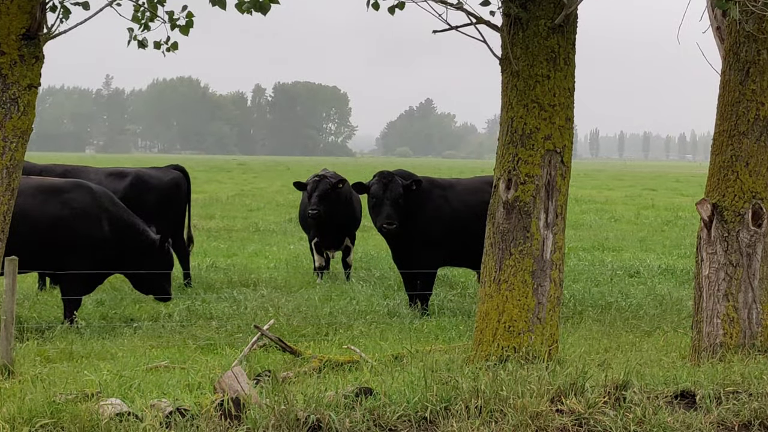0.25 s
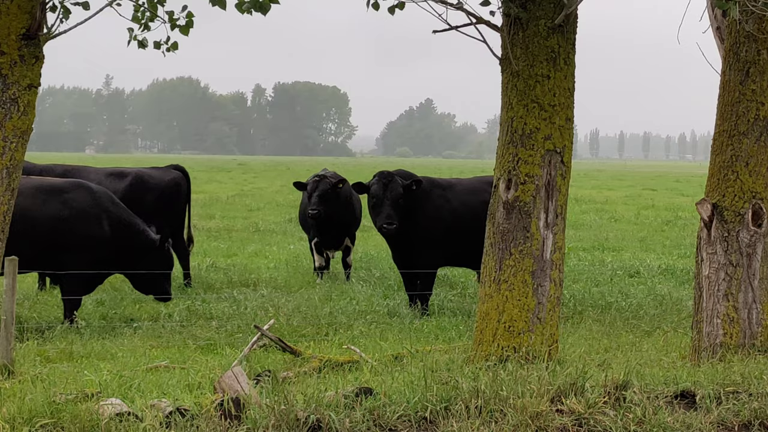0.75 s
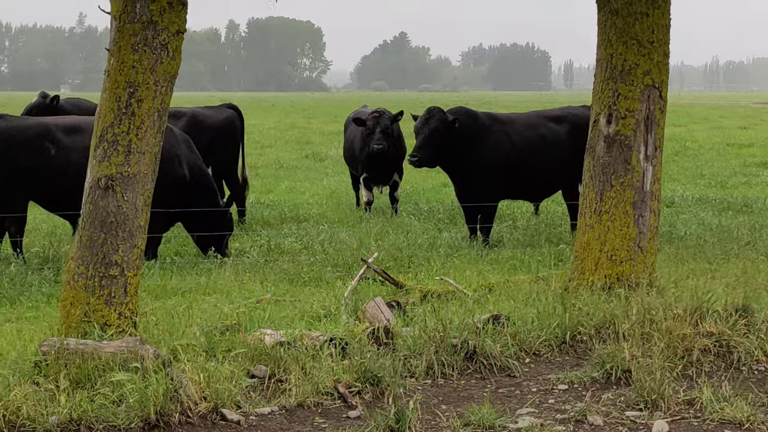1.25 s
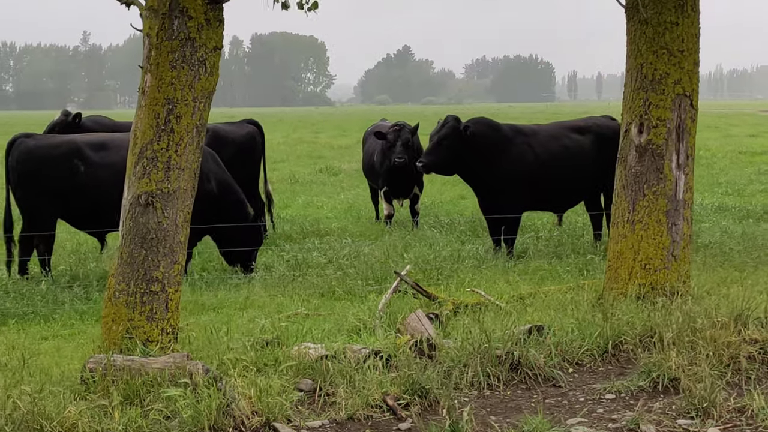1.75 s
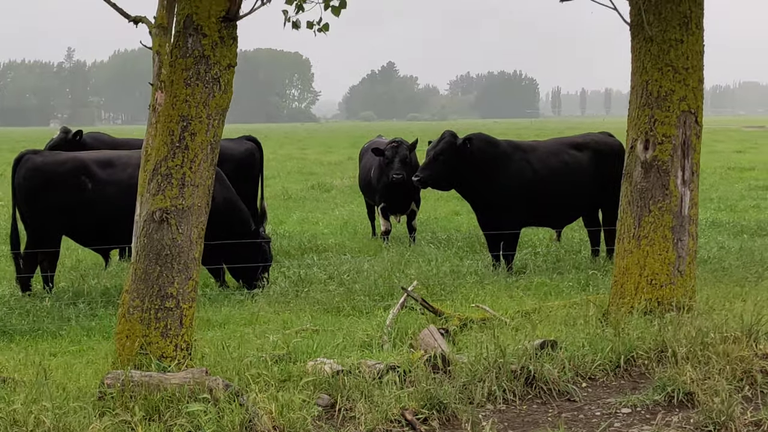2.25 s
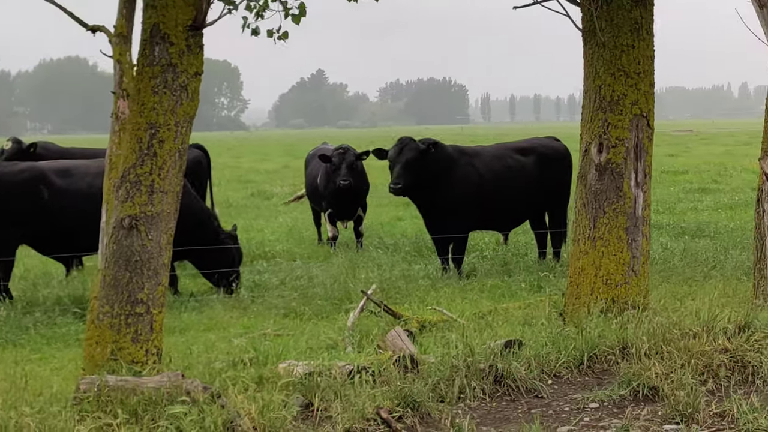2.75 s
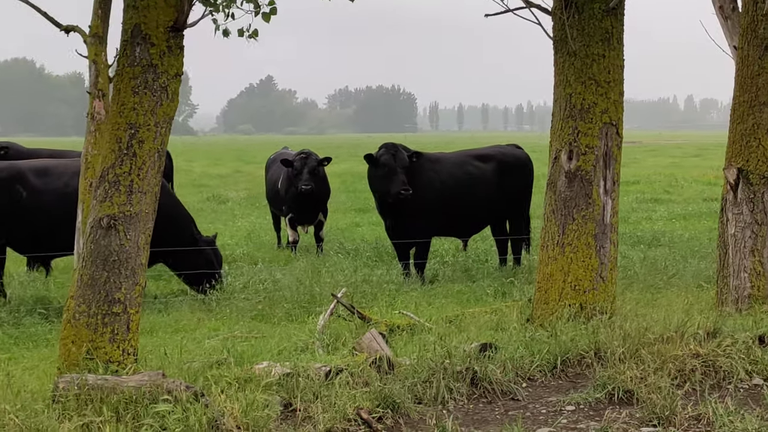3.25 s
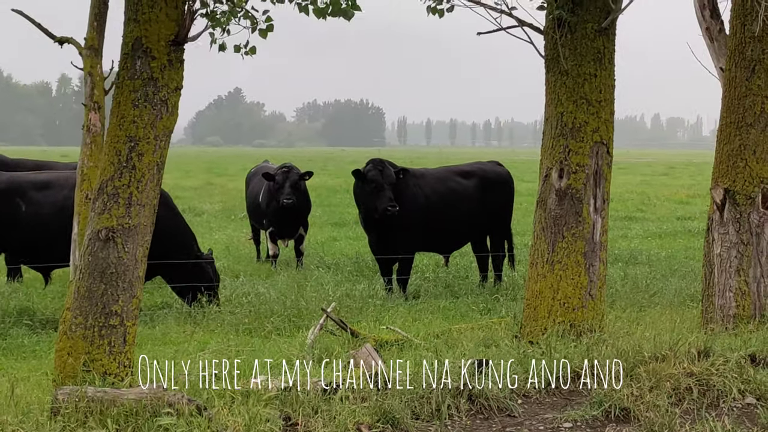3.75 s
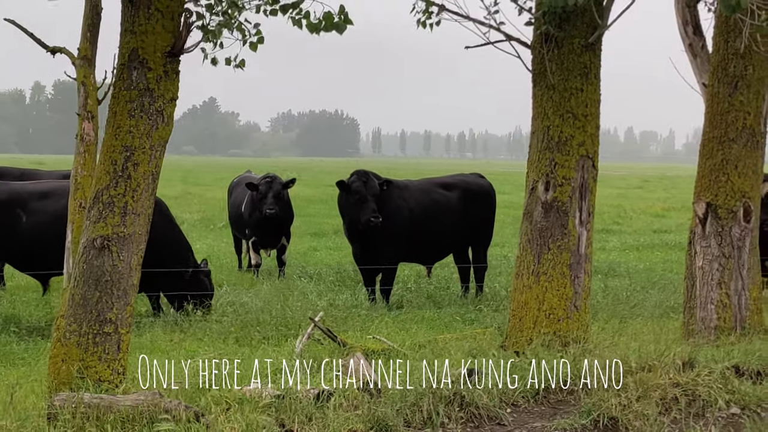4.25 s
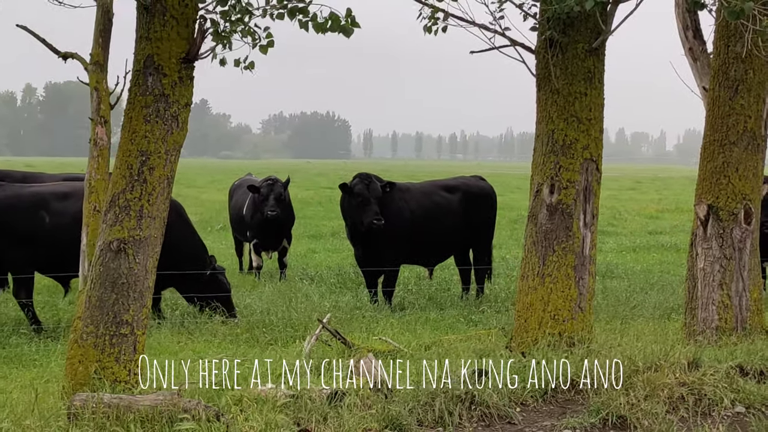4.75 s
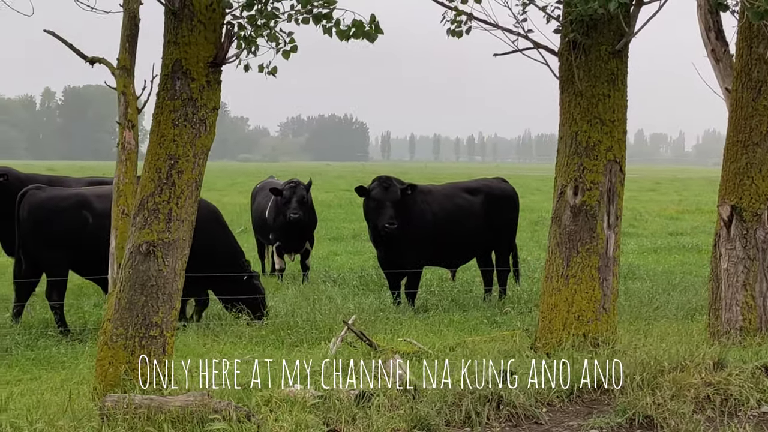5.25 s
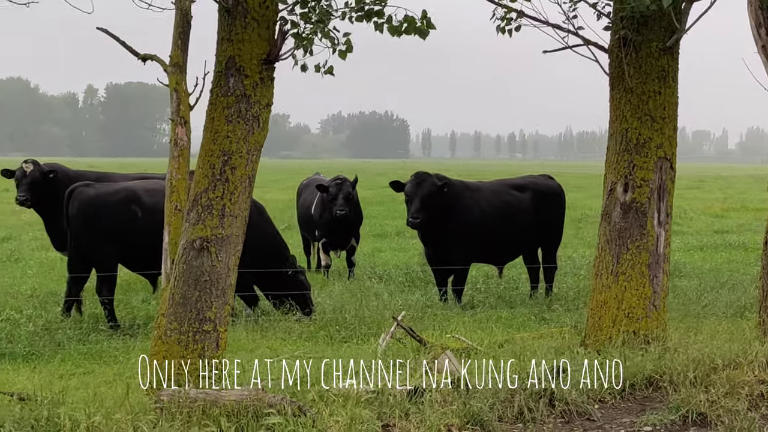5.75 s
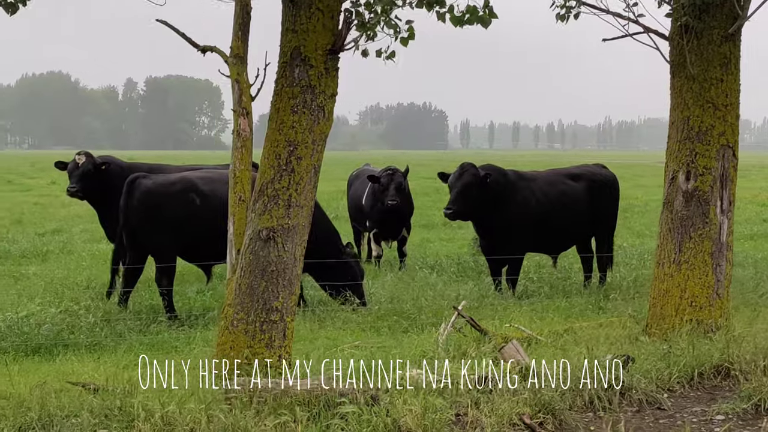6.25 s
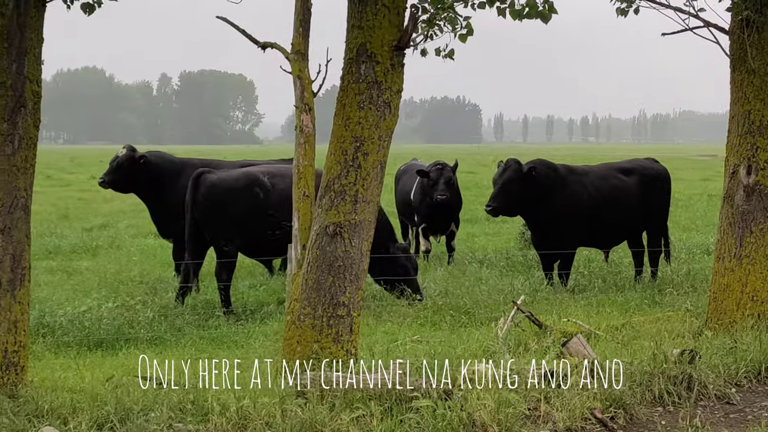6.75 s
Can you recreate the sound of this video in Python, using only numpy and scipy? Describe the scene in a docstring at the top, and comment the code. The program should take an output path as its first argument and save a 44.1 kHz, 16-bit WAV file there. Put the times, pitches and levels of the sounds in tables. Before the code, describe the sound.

An open pasture murmurs faintly, with small birds whistling and warbling in the trees throughout and a distant chorus leaning slightly left. From the start, gusts thump and rumble on the stereo microphone while a nearby bird gives short chucks. At about 0.6 seconds a bull lows for one second, a clean nasal hum that rises slightly, drops and ends in a puff of breath. The wind eases after 1.2 seconds and buffets again from 2.4 to 3. In the calmer stretch from 3 to 4.5 seconds, the nearby bird repeats a quick run of chucks. Leaves rustle softly, with tiny snaps around 3.4, and scattered drops tick on them, clearest near 1.9 and 3.9. From 5.6 to 6.6 seconds the bull lows again, slightly softer and hoarser, closing with another puff. Strong gusts return at about 6.2 and thump until the end at 7 seconds.

```python
"""A bull lows twice in an open pasture: a clean nasal hum from the vocal folds, carried by its
second harmonic and ending in a puff of breath. Close up, gusts thump on the two ports of a stereo
microphone. Small birds chuck and warble in the trees, with a chorus of others far off.
Leaves rustle, drops tick on them nearby, and the field murmurs and hisses faintly."""
import sys
import numpy as np
from scipy import signal
from scipy.io import wavfile
from scipy.ndimage import uniform_filter1d

SR = 44100
rng = np.random.default_rng(int(sys.argv[2]) if len(sys.argv) > 2 else 0)


def pcm_store(signal):
    """Save signal as 16-bit PCM."""
    levels = np.round(np.clip(np.atleast_2d(signal), -1, 1) * 32767)
    wavfile.write(sys.argv[1], SR, levels.astype(np.int16).T)


N = 308287
TIME_S = np.arange(N) / SR


def amp(db):
    return 10 ** (np.asarray(db) / 20)


def unit_rms(x):
    return x / np.sqrt(np.mean(x ** 2) + 1e-20)


def butter(x, order, hz, kind):
    return signal.sosfilt(signal.butter(order, hz, kind, fs=SR, output="sos"), x)


def over_time(rows):
    times, *columns = np.transpose(rows)
    return [np.interp(TIME_S, times, column) for column in columns]


def at_hz(points, hz):
    freqs, values = np.transpose(points)
    return np.interp(np.log(hz), np.log(freqs), values)


def drift(rate_hz):
    """A smooth random wander with an rms near 1."""
    pole = np.exp(-40 * np.pi * rate_hz / SR)
    slow = signal.lfilter([1], [1, -2 * pole, pole ** 2], rng.standard_normal(N // 20 + 2002))[2000:]
    return np.interp(np.arange(N) / 20, np.arange(len(slow)), unit_rms(slow))


def place(out, start_s, sound, pan_db):
    """Mix a short sound in; the nearer port hears it louder and first. Positive pan is left."""
    lag = .55 * pan_db  # samples between the ports
    for channel, side in enumerate((1, -1)):
        i = max(round(start_s * SR - side * lag / 2), 0)
        out[channel, i:i + len(sound)] += sound[:max(N - i, 0)] * amp(side * pan_db / 2)


# How alike the two ports hear diffuse noise: freq_hz, correlation
PORT_LIKENESS = [(25, 0.73), (70, 1), (300, 0.99), (600, 0.9), (1200, 0.087), (2500, 0.69), (4000, 0.61),
                 (9000, 0.87), (13000, 0.074)]

def diffuse_noise(spectrum, flicker_db, flicker_hz):
    """Stereo noise of rms 1 in roughly third-octave bands, each with its own level and flicker."""
    bottom, top = spectrum[0][0], spectrum[-1][0]
    edges = np.geomspace(bottom, top, int(3 * np.log2(top / bottom)) + 3)
    white = rng.standard_normal((2, 2, N))
    out, shared_drift = 0, drift(flicker_hz)
    for k, band in enumerate(zip(edges, edges[1:])):
        mid, side = butter(white[k % 2], 2, band, "band")
        hz = np.sqrt(band[0] * band[1])
        alike = at_hz(PORT_LIKENESS, hz)
        gain = amp(at_hz(spectrum, hz) + flicker_db * (.4 * shared_drift + drift(flicker_hz)))
        out = out + gain * (np.sqrt(1 + alike) * mid + np.sqrt(1 - alike) * side * [[1], [-1]])
    return unit_rms(out)


# Gusts right at the microphone: time_s, level_db
GUSTS = [(0.0, -8), (.3, -21.5), (.47, -26), (0.66, -10), (0.86, -28.5), (1.2, -26.5), (1.75, -42.5),
         (2.3, -48), (2.43, -27.5), (2.63, -14.5), (2.95, -27), (3.02, -41), (3.3, -52), (3.9, -38),
         (4.1, -38), (4.4, -30.5), (4.6, -41.5), (5.1, -44), (5.57, -31.5), (6.15, -32), (6.41, -12),
         (6.99, -15.5)]
# Spectrum of their rumble: freq_hz, density_db
RUMBLE = [(12, -43.5), (25, 2.5), (60, -20.5), (80, 4), (102, 3.5), (172, -23.5), (222, -13.5),
          (286, -15.5), (440, -69), (900, -53), (1170, -90.5), (1980, -120)]
# The hardest eddies on the ports: middle_s, level_db, pitch_hz, length_s, edge_db
THUMPS = [(.013, -8, 146, 0.016, -18), (.028, -6, 151, 0.015, -49), (.062, -11, 106, 0.021, -55),
          (.114, -4.5, 154, 0.0084, -36), (.17, -22, 99, 0.016, -58), (.205, -16, 129, 0.016, -51),
          (.234, -9, 107, 0.018, -53), (.259, -6, 139, 0.011, -51), (.33, -14.5, 102, 0.021, -65),
          (.363, -13, 111, 0.024, -64), (.418, -17, 173, 0.0089, -57), (.522, -8.5, 121, 0.0079, -59),
          (.536, -10.5, 118, 0.027, -62), (.56, -30, 111.4, 0.014, -60), (.605, -8, 106, 0.017, -63),
          (.622, -1, 104.6, 0.023, -51), (.676, -6.5, 134, 0.017, -39), (.706, -13, 112, 0.011, -44),
          (.731, 3, 103, 0.026, -13), (1.046, -12.5, 94, 0.029, -45), (1.119, -17, 112, 0.028, -45),
          (1.195, 1.5, 116.5, 0.03, -8), (1.572, -25, 78.66, 0.027, -67), (1.757, -27.5, 89.8, 0.04, -67),
          (1.787, -26, 79.5, 0.059, -70), (1.98, -25.5, 70, 0.033, -70), (2.03, -32, 106.5, 0.052, -70),
          (2.387, -24, 110, 0.035, -68), (2.411, -15.5, 99, 0.025, -68), (2.432, -31, 110, 0.022, -73),
          (2.474, -8.5, 111, 0.026, -57), (2.502, -18.5, 153, 0.024, -64), (2.552, -5.5, 109.4, 0.015, -57),
          (2.607, -10, 128.8, 0.034, -60), (2.685, -2, 127.8, 0.011, -45), (2.733, -7, 109, 0.029, -59),
          (2.752, -8, 100, 0.029, -41), (2.836, -16, 94.3, 0.064, -43), (2.899, -24, 120, 0.015, -60),
          (2.948, -15.5, 113, 0.023, -58), (2.973, -16.5, 178, 0.016, -66), (3.569, -13.5, 132, 0.01, -50),
          (4.36, -19, 147, 0.008, -65), (6.245, -2.5, 150, 0.0087, -63), (6.29, 1, 98, 0.02, -55),
          (6.312, -7, 161, 0.014, -63), (6.343, -4, 141.2, 0.0145, -45), (6.381, -6.5, 168, 0.016, -58),
          (6.405, -13, 186, 0.0078, -49.5), (6.422, 0.5, 184, 0.0088, -32), (6.431, -8, 151.5, 0.018, -41),
          (6.454, 3, 173, 0.013, -34), (6.475, -7.5, 159, 0.015, -21), (6.503, -6.5, 192, 0.0087, -51),
          (6.527, -7, 197, 0.03, -41), (6.568, -14.5, 230, 0.011, -39), (6.604, -3, 126, 0.015, -27),
          (6.617, -11, 228, 0.011, -54), (6.634, -2, 192, 0.0089, -50), (6.681, 3.5, 145.9, 0.0077, -25),
          (6.71, -4.5, 150.7, 0.012, -33), (6.718, -5, 183, 0.021, -22), (6.742, -10, 170, 0.008, -43),
          (6.764, -8.5, 132, 0.0062, -55), (6.825, -9, 117.4, 0.028, -36), (6.857, -5, 156, 0.01, -55),
          (6.894, -1.5, 206, 0.011, -74), (6.908, -11, 197, 0.0074, -62), (6.961, -12, 166, 0.013, -57),
          (6.982, -8, 108, 0.019, -60)]

def wind():
    """Gusts rumble on the ports; each eddy is a short pressure swing with a sharp edge at its height."""
    gust_db, = over_time(GUSTS)
    when, weakness, pitch, stretch = rng.random((round(13 * N / SR), 4)).T  # 13 lesser eddies a second
    eddy_db = gust_db[(when * N).astype(int)] + 9.5 - 13 * weakness
    eddy_hz = 95 * 1.7 ** pitch
    eddy_s = 2.344 * (.5 + stretch) / eddy_hz
    eddies = THUMPS + list(zip(when * N / SR, eddy_db, eddy_hz, eddy_s, eddy_db - 39.5))
    thumps = np.zeros((2, N))
    for middle_s, db, hz, length_s, edge_db in eddies:
        turn, side = rng.random(2)
        body = [(hz, length_s, db), (2.26 * hz, .009, (db + edge_db) / 2 - 1.5)]
        edge = [(620, .005, edge_db - 7), (1050, .003, edge_db - 14.5)]
        for swing_hz, swing_s, swing_db in body + edge:
            t = np.arange(round(swing_s * SR)) / SR
            swing = amp(swing_db) * np.hanning(len(t)) * np.sin(2 * np.pi * (swing_hz * t + turn))
            place(thumps, middle_s - swing_s / 2, swing, pan_db=3 * side - 1.5)
    rumble = amp(gust_db - 5) * diffuse_noise(RUMBLE, flicker_db=2, flicker_hz=20)
    return butter(thumps, 2, 72.5, "high") + rumble


# The open pasture all around: freq_hz, density_db
FIELD_SPECTRUM = [(12, -29), (20, 6.5), (76, 2), (145, -14), (282, -3.5), (477, -15), (549, -14),
                  (729, -19), (790, -24.5), (1280, -21), (1740, -39), (2080, -17.5), (2500, -12.5),
                  (3250, -54.5), (5500, -120)]
# Its slow swells: time_s, gain_db
FIELD_SWELLS = [(0, -2), (1.5, 2.5), (2.2, -1), (3.3, -1.5), (3.6, 4), (4.0, 0), (4.18, 4), (4.33, 3),
                (4.5, 3.5), (4.7, 1), (5.2, -0.5), (5.6, 1), (6.99, -1)]

def field():
    """A low murmur with a faint hiss above it."""
    swell_db, = over_time(FIELD_SWELLS)
    return amp(swell_db - 42.5) * diffuse_noise(FIELD_SPECTRUM, flicker_db=2, flicker_hz=16.6)


def whistle(db, length_s, from_hz, to_hz, rough, skew, waver):
    """A bird's gliding near-sine: rough flutters its level, waver its pitch; skew under 1 peaks early."""
    progress = np.linspace(0, 1, round(np.clip(length_s, .008, .2) * SR))
    flutter, wobble = uniform_filter1d(rng.standard_normal((2, len(progress))), 90)
    envelope = np.sin(np.pi * progress ** skew) * (1 + rough * unit_rms(flutter))
    pitch_hz = (from_hz + (to_hz - from_hz) * progress) * (1 + waver * unit_rms(wobble))
    phase = 2 * np.pi * np.cumsum(pitch_hz) / SR
    return amp(db) * envelope * (np.sin(phase) + amp(-36) * np.sin(2 * phase))


# Birds far across the pasture: time_s, level_db
CHORUS_LEVEL = [(0.0, -42), (0.56, -45), (1.38, -38), (1.5, -41), (2.3, -47), (2.49, -43), (3.35, -44.5),
                (3.7, -40.5), (3.89, -46.5), (4.13, -46), (4.3, -43), (4.88, -41), (5.14, -45),
                (5.76, -41.5), (6.09, -47.5), (6.39, -45), (6.56, -42), (6.99, -41.5)]
# Their spectrum: freq_hz, density_db
CHORUS_SPECTRUM = [(880, -26.5), (1500, -10), (1720, 1.5), (2110, -18), (3400, -2), (4060, -0.5),
                   (5890, -12), (6920, -4), (7950, -11), (8860, -21), (9500, -34), (12400, -65),
                   (20900, -120)]

def far_chorus():
    """Birds too far to tell apart blur into a hiss that leans left; air takes its top off."""
    chorus_db, = over_time(CHORUS_LEVEL)
    hiss = amp(chorus_db - 3.2) * diffuse_noise(CHORUS_SPECTRUM, flicker_db=2, flicker_hz=6)
    return butter(hiss * amp([[.9], [-.9]]), 10, 8000, "low")


def far_twitter(notes_per_s=160):
    """Distant whistles at random, as loud or soft as the chorus around them."""
    out = np.zeros((2, N))
    chorus_db, = over_time(CHORUS_LEVEL)
    for when, pitch, glide, size, side in rng.random((round(notes_per_s * N / SR), 5)):
        hz = 2800 * 2.2 ** pitch ** 1.5  # most lie low in the range
        to_hz = hz * 1.15 ** (2 * glide - 1)
        db = chorus_db[int(when * N)] + 1 + .8 * at_hz(CHORUS_SPECTRUM, hz) - 9 * size
        note = whistle(db, .015 + .05 * size, hz, to_hz, rough=.45, skew=.79, waver=.018)
        place(out, when * N / SR, note, pan_db=6 * side - 1.2)
    return out


# One bird near the microphone: start_s, level_db, pitch_hz, pan_db
CHUCKS = [(0.033, -36, 2370, 4.5), (0.099, -41.5, 2700, 3), (0.183, -33.5, 2550, 4), (0.345, -35, 2520, 2),
          (0.5267, -33, 2420, 4), (0.74, -39, 2340, 2), (0.9716, -37, 2270, -3.5), (2.9335, -37.5, 2260, 3),
          (3.1332, -33, 2300, 2), (3.276, -31, 2460, 3), (3.4248, -32.5, 2550, 4), (3.5828, -31, 2540, 3.5),
          (3.7483, -30.5, 2420, 4.5), (3.9169, -30.5, 2550, 4.5), (4.0883, -30, 2520, 4),
          (4.2895, -38.5, 2480, 0), (4.532, -36, 2390, 0.5)]

def chucks():
    """Each chuck is a quick falling whistle with a weak low tail."""
    out = np.zeros((2, N))
    for start_s, db, hz, pan_db in CHUCKS:
        head = whistle(db, .024, 1.05 * hz, .93 * hz, rough=.5, skew=.35, waver=.04)
        tail = whistle(db - 16, .024, .9 * hz, .54 * hz, rough=.9, skew=.6, waver=.027)
        place(out, start_s, head, pan_db)
        place(out, start_s + .01, tail, pan_db)
    return out


# Chips from the trees, a little left: start_s, length_s, level_db, tilt_db_per_khz
CHIPS = [(0.063, 0.067, -43, 1), (0.28, 0.079, -41, -0.7), (1.222, 0.013, -37, -5), (4.291, 0.018, -35, -3)]
# The partials of one chip: pitch_hz, gain_db
CHIP_PARTIALS = [(3900, -8.5), (4900, -1), (5700, -5.5), (6800, 3.5), (7400, -3.5), (8050, -12)]

def chips():
    """A bird's harsh chip: rough partials that sound together."""
    out = np.zeros((2, N))
    for start_s, length_s, level_db, tilt in CHIPS:
        for hz, gain_db in CHIP_PARTIALS:
            db = level_db + gain_db + tilt * (hz / 1000 - 6)
            partial = whistle(db, length_s, hz, hz, rough=.7, skew=.63, waver=.035)
            place(out, start_s, partial, pan_db=2)
    return out


# Other birds in the trees: start_s, length_s, from_hz, to_hz, level_db
CLEAR_NOTES = [(.064, 0.029, 3480, 7770, -38), (.088, .018, 5260, 7700, -44),
               (0.242, 0.015, 4970, 4130, -47), (0.276, 0.036, 3690, 7740, -38),
               (0.307, .02, 4800, 7320, -40), (.29, 0.056, 8050, 8000, -49),
               (0.369, 0.054, 4450, 4480, -36), (3.315, 0.044, 6800, 6800, -44),
               (6.371, 0.047, 3400, 3800, -41), (6.642, 0.032, 4400, 4070, -30),
               (0.673, 0.016, 4750, 4820, -38), (0.816, 0.054, 4120, 3980, -37),
               (0.865, 0.048, 3460, 3380, -39), (0.912, 0.058, 5300, 4730, -39.5),
               (1.005, 0.045, 5200, 4900, -36), (1.263, 0.048, 3520, 3850, -33.5),
               (1.366, 0.029, 4240, 4070, -36), (1.391, 0.017, 3370, 3680, -34),
               (1.429, 0.046, 3110, 3930, -40), (1.459, 0.04, 4940, 4960, -40),
               (1.7, 0.018, 3900, 4570, -42), (1.82, .05, 5750, 5750, -46), (1.948, 0.025, 4300, 5400, -41),
               (1.968, .02, 5250, 4350, -36), (1.99, 0.031, 4800, 4700, -43),
               (2.054, 0.023, 4070, 5300, -42), (2.25, .06, 6130, 6150, -50),
               (2.578, .018, 5250, 6880, -38), (2.597, 0.048, 5760, 5820, -44),
               (2.65, 0.032, 6700, 6900, -47), (2.294, 0.1, 4360, 4730, -40), (2.39, 0.03, 4650, 3980, -39),
               (2.419, 0.046, 4170, 4080, -39), (2.833, 0.07, 4830, 4900, -45.5),
               (3.08, 0.024, 4500, 5470, -39.5), (3.153, 0.034, 4370, 4600, -40),
               (3.207, 0.023, 4200, 4060, -38), (4.117, 0.042, 4100, 4230, -36),
               (4.164, 0.051, 3410, 3670, -38.5), (4.2, 0.038, 4970, 5160, -45),
               (4.273, 0.024, 4150, 4030, -38), (4.268, 0.026, 7760, 8400, -38.5),
               (4.52, 0.027, 7080, 7200, -51), (4.89, 0.036, 5070, 5200, -36),
               (5.178, .03, 6600, 6600, -47), (5.25, 0.062, 6900, 6830, -47),
               (5.305, 0.033, 5000, 5100, -52), (5.342, 0.039, 5750, 5540, -44),
               (4.948, 0.037, 4740, 4870, -37), (5.021, 0.038, 4530, 4750, -40.5),
               (5.399, 0.054, 4160, 4050, -36), (5.423, 0.045, 3150, 3190, -38),
               (5.449, 0.033, 5300, 5130, -37), (5.648, 0.039, 5920, 5900, -47),
               (6.27, 0.03, 6100, 6200, -46), (5.74, 0.029, 4850, 4100, -44),
               (5.839, 0.079, 4120, 3980, -34), (5.89, 0.05, 3510, 3400, -39),
               (5.925, 0.018, 4480, 5100, -30), (5.948, 0.061, 3770, 4390, -38.5),
               (5.992, 0.032, 3600, 3820, -40), (6.109, 0.045, 4630, 4530, -46),
               (6.156, 0.044, 5080, 5300, -48.5), (6.309, 0.069, 4580, 4580, -44),
               (6.367, 0.038, 5800, 5800, -43), (6.479, 0.009, 5300, 6200, -38.5),
               (6.486, 0.0071, 6000, 7200, -36), (6.498, 0.016, 4020, 4170, -34),
               (6.551, 0.073, 3360, 3160, -41.5), (6.541, .045, 4200, 4190, -40)]

def clear_notes():
    """Single clean whistles from scattered directions, more of them on the left."""
    out = np.zeros((2, N))
    for start_s, length_s, from_hz, to_hz, db in CLEAR_NOTES:
        note = whistle(db + .5, length_s, from_hz, to_hz, rough=.3, skew=.63, waver=.014)
        place(out, start_s, note, pan_db=rng.normal(1.6, 3.3))
    return out


def trunk_scatter(song):
    """Birdsong plus its echoes off trunks and ground, each in the opposite channel."""
    out = song.copy()
    for k, delay_s in enumerate(rng.uniform(.012, .21, size=28)):
        lag = round(delay_s * SR)
        out[k % 2, lag:] += amp(-19 - 90 * delay_s) * song[1 - k % 2, :-lag]
    return out


# Leaves stirring in the trees: peak_s, level_db, swell_s, fade_s (swell and fade span 20 dB)
RUSTLES = [(.18, -63, .02, .04), (.62, -48.5, 0.085, 0.033), (1.23, -49, 0.14, 0.35),
           (1.6, -56, 0.037, 0.033), (2.511, -62, 0.043, 0.12), (2.85, -62, 0.017, 0.21),
           (3.35, -48, 0.021, 0.23), (4.3, -54, 0.075, 0.082), (4.78, -59, 0.41, 0.053),
           (5.49, -59, 0.17, 0.087), (5.6, -56, 0.027, 0.058), (5.772, -62, 0.052, 0.2),
           (5.92, -47.5, 0.26, 0.24), (6.22, -57, 0.098, 0.19), (6.62, -52.5, 0.14, 0.039),
           (6.98, -68, 0.12, .05)]
# Their spectrum: freq_hz, density_db
LEAF_SPECTRUM = [(5000, -47.5), (8500, -3), (9150, -8), (10000, -14.5), (11500, -5.5), (13100, -8.5),
                 (14800, -4), (15700, -20)]
# Dry twigs and leaves snapping, a little left: start_s, level_db
SNAPS = [(0.1844, -51), (0.619, -38), (1.2231, -31), (1.6053, -43), (1.8926, -46), (2.8818, -39),
         (3.3443, -25), (3.3752, -37), (3.4306, -30), (3.4774, -43), (3.536, -63), (4.2914, -47),
         (5.597, -45), (6.2337, -46), (6.542, -40)]

def leaves():
    """A bright rustle swells with each stir, broken up by tiny snaps and a few louder ones."""
    level = amp(-70) + sum(amp(db - 20 * np.maximum((s - TIME_S) / swell_s, (TIME_S - s) / fade_s))
                           for s, db, swell_s, fade_s in RUSTLES)
    tiny_snaps = (rng.random(N) < 250 / SR) * np.minimum(rng.exponential(1, N), 2.5)
    grain = 1 + .8 * signal.lfilter([1], [1, -.97], tiny_snaps)
    out = level * unit_rms(grain * diffuse_noise(LEAF_SPECTRUM, flicker_db=2.5, flicker_hz=6.4))
    decay = np.exp(-TIME_S[:600] / .0011)
    for start_s, db in SNAPS:
        crack = butter(rng.standard_normal(len(decay)) * decay, 3, 6000, "high")
        place(out, start_s, amp(db - 4) * crack, pan_db=1.5)
    return out


# One bird repeating itself, a little left: start_s, level_db, pitch_ratio
CHIRRUPS = [(0.325, -39.5, 0.96), (1.175, -39.5, 1.03), (2.59, -37.5, 1.017), (3.515, -39, 0.98),
            (4.43, -38.5, .99), (5.575, -39, 1), (6.641, -40.5, 1)]
# Its rise, fall, flick and tail: offset_s, length_s, from_hz, to_hz, gain_db
CHIRRUP_NOTES = [(-.022, .022, 4700, 5730, -5), (0, .03, 4250, 4600, 0), (.022, 0.03, 4050, 3450, 1.5),
                 (.047, .024, 3000, 3550, 2.5), (.072, .022, 3800, 3050, 1.5),
                 (.092, .04, 3700, 3500, -5.5)]

def chirrups():
    """A scratchy phrase in two voices at once, each with its own strong flutter and waver."""
    out = np.zeros((2, N))
    for start_s, db, ratio in CHIRRUPS * 2:
        for offset_s, length_s, from_hz, to_hz, gain_db in CHIRRUP_NOTES:
            note = whistle(db + gain_db - 1, 1.2 * length_s, from_hz * ratio, to_hz * ratio,
                           rough=.7, skew=.8, waver=.047)
            place(out, start_s + offset_s, note, pan_db=2)
    return out


def resonance(hz, centre_hz, width_hz):
    return 1 / (1 + (2 * (hz - centre_hz) / width_hz) ** 2)


# The bull's throat resonances: centre_hz, width_hz, gain_db (against harmonic 2)
THROAT = [(109, 47, -37), (504, 41, -43.5), (670, 37, -40), (2160, 210, -53), (2520, 92, -62)]
# Those that carry harmonics 3 and 4: centre_hz, width_hz, gain_db
LOW_THROAT = [(353, 53, -10.5), (428.6, 14, -19)]
# Passing mouth and nose resonances: start_s, length_s, from_hz, to_hz, width_hz, level_db
VOWELS = [(.62, .14, 690, 716, 60, -44), (.67, .26, 700, 755, 55, -36.5), (.88, .12, 750, 765, 50, -52),
          (.88, .26, 1175, 1225, 60, -51), (.95, .6, 975, 1040, 80, -49), (.85, .68, 640, 690, 70, -50),
          (.74, .2, 1030, 1050, 60, -56), (.75, .2, 1500, 1510, 100, -56), (.9, .66, 1740, 1730, 200, -51),
          (1.18, .35, 1300, 1300, 200, -55), (5.9, .72, 1055, 1075, 70, -52),
          (5.8, .76, 1350, 1395, 70, -52), (6.15, .25, 750, 755, 60, -56), (6.06, .5, 1282, 1285, 60, -53),
          (5.86, .6, 1800, 1810, 260, -55)]

def harmonic_gain(k, pitch_hz, level_db, opening_db, span):
    """How strongly throat, mouth and nose pass harmonic k during one call."""
    if k == 2:
        return amp(level_db)
    hz, t = k * pitch_hz, TIME_S[span]
    if k in (3, 4):
        throat = sum(amp(db) * resonance(hz, centre, width) for centre, width, db in LOW_THROAT)
        return amp(level_db + opening_db + 1.5 * drift(25)[span]) * throat
    throat = sum(amp(db) * resonance(hz, centre, width) for centre, width, db in THROAT)
    mouth = 0
    for start_s, length_s, from_hz, to_hz, width_hz, db in VOWELS:
        progress = np.clip((t - start_s) / length_s, 0, 1)
        envelope = np.abs(np.sin(np.pi * progress)) ** .6 * (progress < 1)  # opens fast and holds
        mouth += amp(db) * envelope * resonance(hz, from_hz + (to_hz - from_hz) * progress, width_hz)
    waver_db = 1.5 * drift(12)[span]
    rasp_db = (1.2 + (k / 9.5) ** 2) * drift(120)[span]
    return amp(waver_db + rasp_db - (k / 11) ** 2) * (amp(level_db) * throat + mouth)


# The bull out in the pasture, a list per call: time_s, pitch_hz, second_harmonic_db, opening_db
MOOS = [
    [(.6, 98.4, -22, -26), (.7, 102, -25, -22), (.77, 104.1, -18, 3), (.854, 107.1, -12.5, -1.5),
     (.976, 109, -15, -0.5), (1.15, 111.2, -15, -0.5), (1.338, 115.3, -16.5, 0.5),
     (1.464, 112, -15.5, -2.5), (1.494, 109.2, -10.5, -11), (1.526, 101.1, -27, -4),
     (1.58, 105, -42.5, -10)],
    [(5.64, 95.7, -28.5, -5), (5.712, 95, -21, -5.5), (5.735, 99, -17.5, -14), (5.82, 101.5, -16.5, -9.5),
     (5.9, 104.3, -20.5, 7), (6.05, 106.6, -18.5, 0), (6.21, 108.3, -18, 2), (6.46, 106.4, -15, -5),
     (6.54, 103.4, -22, 9.5), (6.6, 98.7, -26, 2)],
]
# Bands of his breath: centre_hz, width_hz, gain_db
BREATH_BANDS = [(460, 500, 3), (1153, 290, -3), (1700, 330, -4.5)]
# Steady breath in each call: level_db
BREATH_DB = [-46.5, -52.5]
# Air let out as each call ends: peak_s, level_db
PUFFS = [(1.545, -30.5), (6.618, -37)]
# Hoarse stretches: middle_s, half_length_s, level_db
RASPS = [(1.36, .2, -65), (5.778, 0.17, -54), (6.543, 0.14, -43.5)]

def bull():
    """Vocal-fold harmonics and breath; a faint, short treble echo widens the moo left and right."""
    out, white = np.zeros(N), rng.standard_normal(N)
    breath = unit_rms(sum(amp(db) * butter(white, 3, [hz - width / 2, hz + width / 2], "band")
                          for hz, width, db in BREATH_BANDS))
    for call, breath_db, (puff_s, puff_db) in zip(MOOS, BREATH_DB, PUFFS):
        span = slice(int(call[0][0] * SR), int((call[-1][0] + .11) * SR))
        t = TIME_S[span]
        pitch_hz, level_db, opening_db = (curve[span] for curve in over_time(call))
        phase = 2 * np.pi * np.cumsum(pitch_hz * (1 + .0022 * drift(21)[span])) / SR
        puff = amp(puff_db - np.maximum(20 * (puff_s - t) / .035, 242 * (t - puff_s)))
        hoarseness = sum(amp(db) * np.clip(1 - ((t - s) / half_s) ** 2, 0, 1) for s, half_s, db in RASPS)
        rasp = hoarseness * (1 + np.cos(phase))  # the folds chop the breath
        voice = (amp(breath_db) * (t < puff_s) + puff + rasp) * breath[span]
        for k in range(1, 28):
            gain = harmonic_gain(k, pitch_hz, level_db, opening_db, span)
            voice += np.sqrt(2) * gain * np.sin(k * phase + rng.uniform(0, 2 * np.pi))
        fade = np.clip(np.minimum(t - t[0], t[-1] - t) / .09, 0, 1)
        out[span] += voice * fade
    echo = amp(-12) * np.roll(butter(out, 1, 900, "high"), round(.0113 * SR))
    return out + echo * [[1], [-1]]


# Drops landing on leaves near the microphone: start_s, level_db, pitch_hz, pan_db
DROPS = [(1.606, -35, 895, 3), (1.891, -28, 1720, 4), (2.078, -36, 1770, 3), (3.536, -33.5, 620, 1.5),
         (3.58, -39, 1030, 2), (3.745, -24.5, 484, 3), (3.88, -22, 1870, 3), (4.794, -31, 1990, 2),
         (5.508, -34.5, 1740, 2), (5.819, -31, 1800, 5), (6.542, -37.5, 2500, 6), (6.683, -33, 1600, 3),
         (6.74, -41, 900, -3), (6.845, -45, 1190, 4)]

def drops():
    """Each drop is a click that rings for a cycle or two."""
    out, t = np.zeros((2, N)), TIME_S[:round(.0023 * SR)]
    for start_s, db, hz, pan_db in DROPS:
        cycles = hz * t
        envelope = np.exp(-.96 * cycles) * (1 - np.exp(-16 * cycles))
        place(out, start_s, amp(db + 9) * envelope * np.sin(2 * np.pi * cycles), pan_db)
    return out


def scene():
    """The pasture from where the microphone stands."""
    bull_and_wind = bull() + wind()
    birds = trunk_scatter(chucks() + chips() + clear_notes() + chirrups() + far_twitter())
    return bull_and_wind + birds + drops() + leaves() + far_chorus() + field()


def record(dry):
    """The microphone drops the deepest bass, squeezes the hardest thumps and cuts the top."""
    heard = butter(dry, 2, 45, "high")
    squeezed = heard / (1 + np.abs(heard) ** 5) ** (1 / 5)
    return signal.sosfilt(signal.cheby2(24, 70, 15780, fs=SR, output="sos"), squeezed)


dry = scene()
out = record(dry)
pcm_store(out)
```